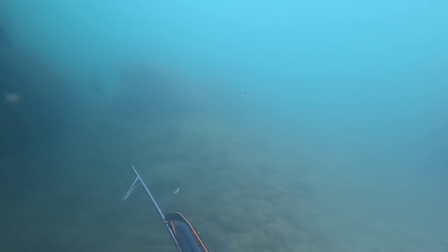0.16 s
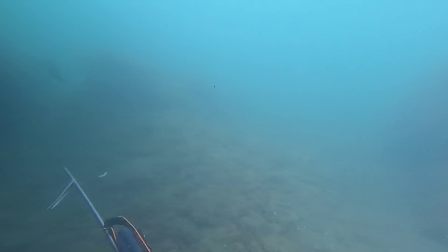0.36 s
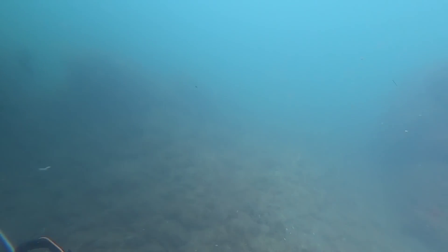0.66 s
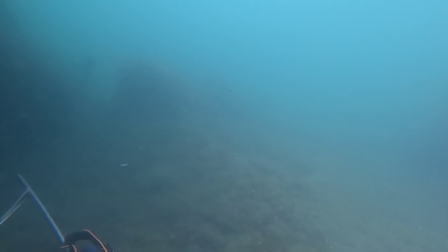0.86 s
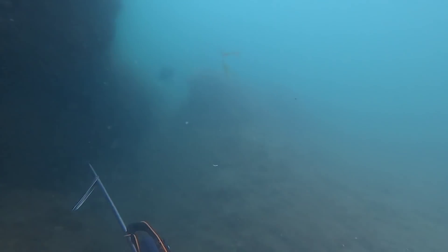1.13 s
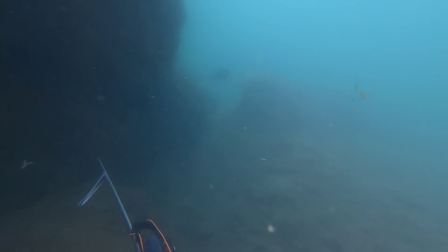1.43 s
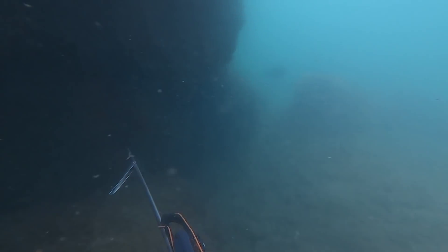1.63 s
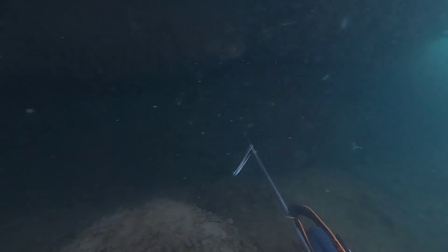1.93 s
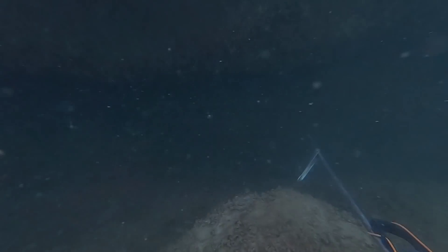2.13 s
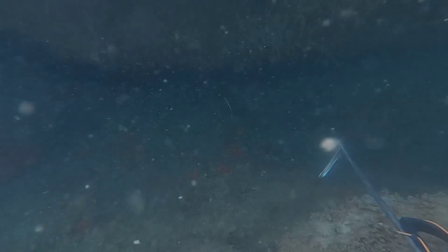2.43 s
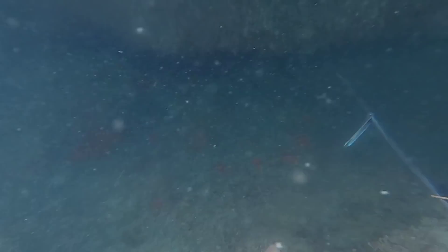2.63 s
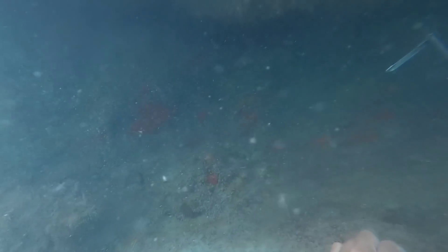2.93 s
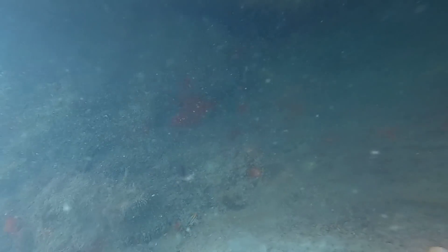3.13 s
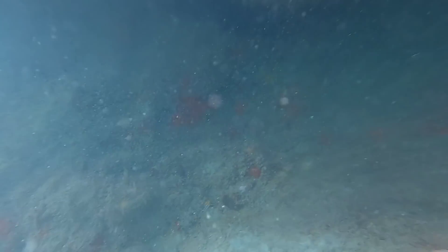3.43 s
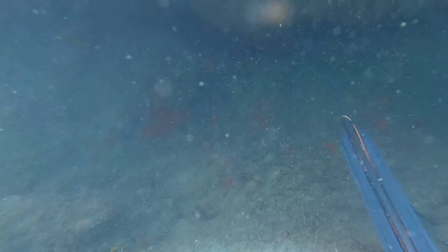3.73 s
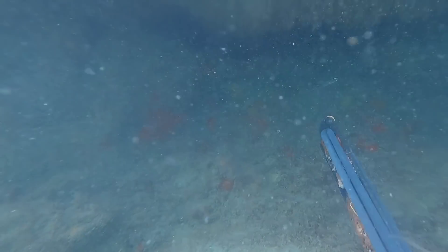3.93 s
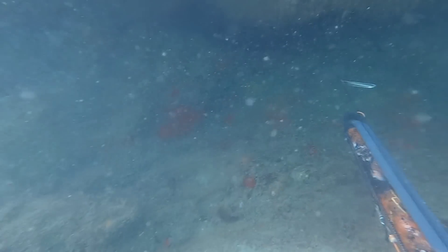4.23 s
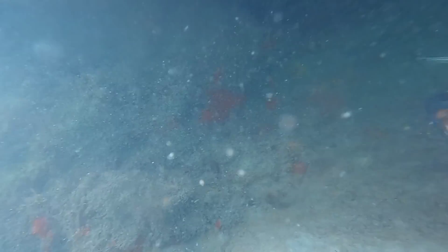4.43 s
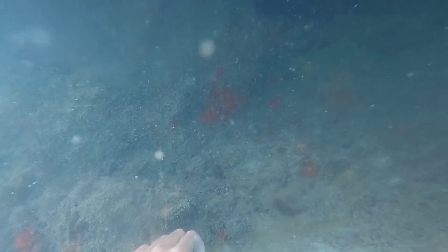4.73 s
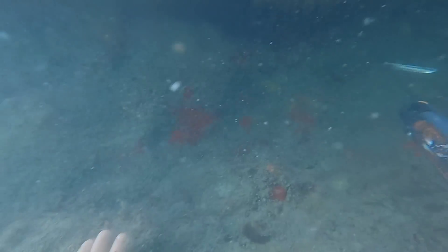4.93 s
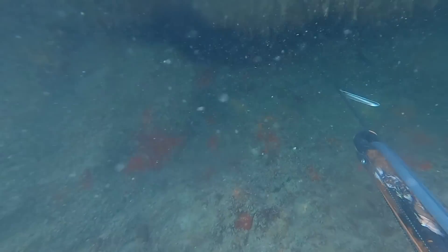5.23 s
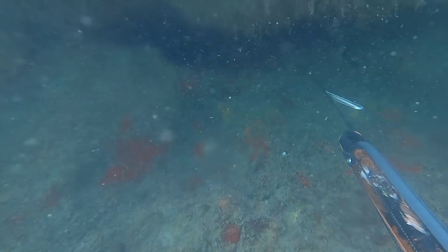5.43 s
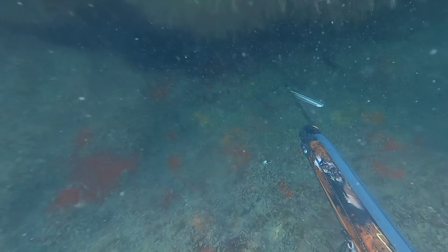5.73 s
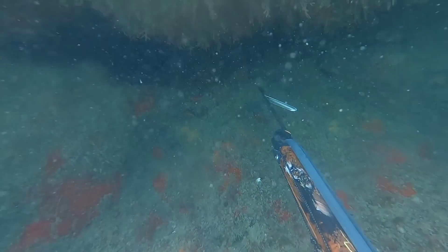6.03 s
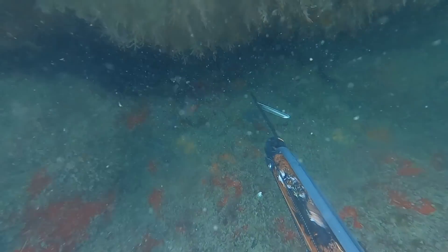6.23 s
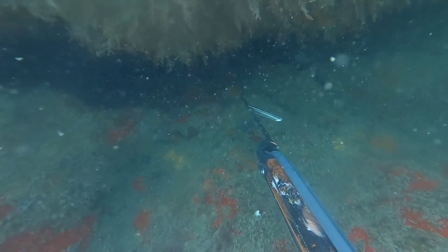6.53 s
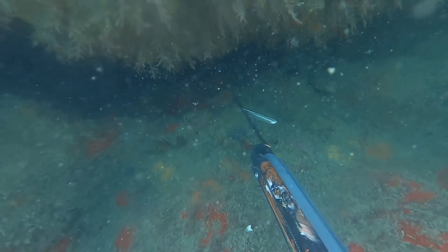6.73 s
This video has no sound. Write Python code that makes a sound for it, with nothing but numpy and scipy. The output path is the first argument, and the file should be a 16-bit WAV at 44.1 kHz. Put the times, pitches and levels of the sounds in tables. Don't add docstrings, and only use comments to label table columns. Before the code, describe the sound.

A diver with a speargun passes rock and seabed. The sealed underwater microphone hears a colony of snapping shrimp as constant frying hiss, with irregular dry clicks standing out, first crowded, later sparser and fainter. Gear and hands bump the case in low, boxy thuds, strongest near 4.8 and 5.8 seconds, between soft scrapes, muffled water buffeting and barely audible blips of bubbles.

```python
import sys
import numpy as np
from scipy import signal
from scipy.fft import rfft, irfft
from scipy.io import wavfile
from scipy.ndimage import uniform_filter1d, minimum_filter1d, map_coordinates

SR = 44100
rng = np.random.default_rng(int(sys.argv[2]) if len(sys.argv) > 2 else 0)


def boost(x):
    u = np.asarray(x, float) / 20
    return 10 ** u


def transcribe(signal):
    frames = np.atleast_2d(signal).T
    limited = np.clip(frames, -1, 1)
    pcm = np.round(limited * 32767).astype(np.int16)
    wavfile.write(sys.argv[1], SR, pcm)


N = 302967
SIZE = 4096
HZ = np.fft.rfftfreq(SIZE, 1 / SR)


def evened(x):
    return x / np.sqrt(np.mean(x ** 2) + 1e-20)


def read(points, hz):
    f, value = np.transpose(points)
    return np.interp(np.log(hz + 1), np.log(f + 1), value)


def curve(rows, column):
    rows = np.array(rows)
    return np.interp(np.arange(N) / SR, rows[:, 0], rows[:, column])


def add(mix, start_s, sound):
    part = mix[..., max(round(start_s * SR), 0):][..., :sound.shape[-1]]
    part += sound[..., :part.shape[-1]]


def causal(db):
    log_gain = np.maximum(db, -100) * np.log(10) / 20
    circle = np.concatenate([log_gain, log_gain[-2:0:-1]])
    return np.exp(log_gain - 1j * signal.hilbert(circle).imag[:len(HZ)])


def wander(hz):
    f = np.fft.rfftfreq(N, 1 / SR)
    return evened(irfft(rfft(rng.standard_normal(N)) * np.exp(-(f / hz) ** 2), N))


def bands(*edges_hz):
    slopes = [1 / (1 + (HZ / edge) ** 8) for edge in edges_hz]
    return np.diff([0 * HZ] + slopes + [1 + 0 * HZ], axis=0)


# start in seconds, peak in dB, then body, edge and sparkle
# over the crack in dB.
SNAPS = [(0.1708, -6, -5.5, 3.5, -15), (0.4106, -19, 3, -1, -28), (0.5607, -19.5, 14, 0, -14),
         (0.6657, -24, 6, 13, -12.6), (0.6919, -12.5, -2.5, -7.5, -8), (0.8505, -11, 5, 11, -12),
         (0.9091, -13.5, 3, -4, -22), (0.9757, -10.5, 5.5, -23, -21), (1.0868, -13.5, 2.5, 9.5, -3),
         (1.2355, -10.5, 3, 9.5, -8), (1.3474, -20.8, 2, 3.5, -5.5), (1.5463, -24.5, 2, -10, -27.0),
         (1.6993, -18.5, 2.5, -5, -13), (1.7155, -20.5, 4, -4.6, -27), (1.7429, -10.5, -2, -7, -14.5),
         (1.9248, -11.5, -6.5, 0.5, -7), (1.9706, -14, -6, -14, -15), (2.1679, -25, 3, -9, -15.1),
         (2.3169, -12, 4.5, -3.5, -28), (2.3325, -25, 0, -3, -14), (2.4032, -12, 3, -18, -16.5),
         (2.4405, -25, 22, 4, 1), (2.6925, -13.5, -5, -20, -21), (2.7944, -18, 5.5, 4, -10),
         (2.9147, -22.5, 4, 10, -7), (3.2665, -16, 5.5, 9.5, 9.5), (3.7286, -24.5, 1, -12, -6),
         (4.2098, -14.5, -2, -11, -18), (4.2543, -18, -7.5, -5, -15), (4.3076, -10.5, 0, -0.5, -21),
         (4.5397, -23.5, 13, 6, -25), (4.5959, -11.5, 2, -4.5, -8.5), (4.6343, -26, -7, -15, -7),
         (4.6702, -21.5, 8, 2, -17), (4.7242, -14.5, 0.5, -1, -8), (4.9287, -16, -2.2, -9, -5),
         (5.3778, -12.5, -6, 11, 2), (5.836, -23, 2, 2.5, -16), (6.172, -8.5, 20.5, 1, -15),
         (6.5112, -24.5, 1, 3, -16),
         (0.088, -30, 11, 9, -21), (0.2179, -29, -20, 0.8, -5), (0.4489, -26.5, 7.5, -3, -12.8),
             (0.4615, -25, 4, -8, -20.7), (0.54, -26, 7, 5, 4), (0.6226, -28, -1.1, 7, -5),
             (0.727, -29, 3, 2, -4), (0.7469, -26.5, 5, -3, -10.6), (0.8762, -27, -11, -10.6, -22),
             (0.8846, -27, -5, -1, 0), (0.919, -25, -10, -4, -5), (1.049, -25, 9, 1, -15.2),
             (1.145, -27, 2, -1, -9), (1.281, -26.5, -3, 9, 0), (1.4768, -27.5, 10, 12, 5),
             (1.509, -28, 1, -3, -11), (1.528, -24, 1, 0, -9), (1.6595, -29.5, 6, 14, -2),
             (1.8714, -25, -9, -2, -8), (1.9114, -28, -17.4, 3, -1), (2.179, -30.5, 10, 0, 14),
             (2.429, -31, -2, 8, -15.9), (2.649, -30, 4, -14, -18), (2.805, -29, -15, 3, -24.8),
             (2.823, -29, -4, 7, -5), (3.024, -24.5, 4, 1.5, -6), (3.3484, -29, -9, -2, -4),
             (3.6515, -26.5, 1.5, -6, -29.9), (4.0753, -25, -11, 16, -7), (4.332, -34, -1.8, -4, -14.5),
             (4.6832, -26.5, 8, 8, -3), (5.1989, -27, -4, -1.4, -5), (5.227, -28, -3, -10, -9),
             (5.461, -26.5, -2, -6, -28), (5.644, -32, -4, -1, -6), (5.6902, -26.5, 2, -24, -14),
             (6.196, -26.5, -7, 6, -5.3), (6.2953, -25.5, 26, 10, -6), (6.5042, -23.5, 9, -1, -21.1),
             (6.6022, -25, 4, 6, -3)]
# start in seconds, peak in dB, tilt from body to sparkle in dB.
TICKS = [(0.2558, -33.5, -3), (0.399, -37, 18), (1.4548, -35, -13), (1.6492, -31, -18), (1.8437, -43, 4),
         (2.2653, -42, -5), (2.273, -38, -2), (2.5833, -39, 14), (2.626, -34, -10), (2.7764, -36, 29),
         (3.163, -28.5, -22), (3.2424, -36, 15.4), (3.2515, -33, -17), (3.3037, -28.5, -11),
         (3.3975, -35.5, -13), (3.464, -35.5, 3), (3.5113, -32, -7), (3.6104, -35.5, 12), (3.698, -38, 33),
         (3.7874, -35, 11), (3.898, -35, -5), (3.917, -29, -5), (4.0884, -28, -30), (4.1205, -36, 26),
         (4.475, -34, 2), (4.5785, -26, -7), (4.835, -30, -6), (4.97, -30, -33), (4.9814, -33.5, 15),
         (4.999, -32.5, -34), (5.0251, -39, -16), (5.242, -30.5, -26), (5.4124, -30.4, -1),
         (5.4834, -28, -25), (5.5448, -30.5, -14), (5.6013, -28.5, -19), (5.635, -29, -21),
         (5.7151, -36, 17.2), (5.7476, -36, 3), (5.786, -27.5, -12), (5.8665, -32.5, -15), (5.9014, -40, 6),
         (6.038, -31.5, -17), (6.0547, -31, -8), (6.0841, -30, -15), (6.1491, -29.5, -15),
         (6.1626, -28.5, -14), (6.2853, -33, 4), (6.4033, -41, 14), (6.4347, -34.5, -30),
         (6.5352, -30, -14), (6.665, -27, -4), (6.6837, -36, 4), (6.773, -37, -1), (6.8267, -33, -12),
         (2.064, -30, -18), (2.081, -31, -12), (0.012, -30, -30), (0.043, -28.5, -32)]


def snap_colours():
    s, peak_db, tilt_db = np.transpose(TICKS)
    body_db = 4.5 + 0.06 * tilt_db
    sparkle_db = body_db + tilt_db
    ticks = np.transpose([s, peak_db, body_db, 0.65 * sparkle_db + 8.5, sparkle_db])
    return np.concatenate([SNAPS, ticks])


# snap time in seconds, lifted band in Hz, cancelled band in Hz, depth in dB.
FACES = [(0.171, 4600, 5960, 15.5), (0.692, 6540, 2400, 5), (0.851, 4160, 6400, 10),
         (0.909, 1320, 2380, 7.5), (0.976, 3870, 2880, 6), (1.087, 4600, 5360, 9), (1.699, 5370, 6180, 10),
         (1.743, 4860, 5600, 11), (1.925, 4700, 5160, 11), (1.971, 1450, 2540, 22), (2.317, 5040, 1290, 9),
         (2.693, 5100, 3080, 7), (2.794, 6000, 2520, 3), (3.266, 2500, 4350, 15), (4.21, 5700, 4910, 7),
         (4.308, 2370, 6400, 3), (4.596, 6400, 4750, 6), (4.724, 5950, 6350, 10), (4.929, 5260, 4740, 8),
         (6.172, 3500, 2820, 9)]


def face_echoes(s):
    width_hz = 550
    db = np.zeros((len(s), len(HZ)))
    for at_s, lifted_hz, cancelled_hz, depth_db in FACES:
        centres_hz = np.array([[lifted_hz], [cancelled_hz]])
        lift, dip = 1 / (1 + (2 * (HZ - centres_hz) / width_hz) ** 2)
        db[abs(s - at_s).argmin()] = depth_db * (lift - dip)
    return boost(db)[:, None]


# frequency in Hz, gain in dB.
WALL = [(300, -8.5), (600, -1), (850, -14), (1300, -1.5), (2500, 2), (6000, -1), (8000, -11.5),
        (10000, -18.5), (13000, -23), (15500, -33), (16300, -41)]
# frequency in Hz, width in Hz, left gain in dB, right gain in dB.
CASE = [(991, 107, 16, 11.5), (915, 77, -5.5, -22), (1110, 27, -7, -4.5), (1452, 49, 6.5, 2),
        (1233, 280, -7, 1), (1747, 350, 13, 5), (2220, 99, -6, 9.5), (2738, 190, 6, -37), (3233, 295, 9, 5),
        (3794, 520, 10, 11.5), (3935, 255, 2.5, -20.5), (4740, 110, 0, 2), (5152, 676, 5.5, 15.5),
        (6820, 1080, -3, 6), (7620, 1040, 6, -6), (8500, 890, 1, -4.5), (12600, 4200, -2, 4)]
# frequency in Hz, left-right likeness from 0 to 1.
LIKENESS = [(700, 1), (1100, .85), (1800, .98), (2700, .7), (3800, .87), (4500, .4), (5200, .88),
            (6200, .3), (7100, .75), (8000, .4), (8800, .7), (10000, .45), (11500, .62), (13000, .3)]
# frequency in Hz, lead of the right port in radians.
LEAD = [(60, 10.5), (330, 0.5), (550, 0), (800, 2), (1700, .5), (2000, 1.5), (2700, 2.5), (3100, 0.55),
        (3700, 6.5), (4300, 1), (5800, 5.5), (6500, 5.5), (7300, -1.5), (7700, 7), (8500, 6.5)]


def ports():
    bumps = []
    for hz, width_hz, left_db, right_db in CASE:
        bumps.append(np.outer([left_db, right_db], 1 / (1 + (2 * (HZ - hz) / width_hz) ** 2)))
    left_db, right_db = read(WALL, HZ) + sum(bumps)
    late = np.exp(-2j * np.pi * HZ * 64 / SR)
    left = causal(left_db) * late
    right = left * boost(right_db - left_db) * np.exp(1j * read(LEAD, HZ))
    same = np.clip(read(LIKENESS, HZ), 0, 1)
    return left, same * right, np.sqrt(1 - same ** 2) * right


SPLIT_HZ = (2500, 4400, 7000)


def snaps():
    s, peak_db, body_db, edge_db, sparkle_db = snap_colours().T[..., None]
    ms = np.arange(SIZE // 2) / SR * 1000 - 8
    after = np.maximum(ms, 0)
    far_db = 1.2 * rng.standard_normal((len(s), 1)) - 0.3 * (peak_db + 12) + 0.15 * np.maximum(body_db, 0)
    spread = np.minimum(1.2 * boost(far_db), 2.6)
    draws = rng.standard_normal((len(s), 2, len(ms)))
    small_bubble = boost(-9.0 / (1 + (HZ / 1150) ** 6))
    left, right, own = np.array(ports()) * small_bubble
    echoed = face_echoes(s) / np.sqrt(1 + (HZ / 14500) ** 10)
    levels_db = (body_db - 0.6, 0 * s, edge_db + 0.2, sparkle_db - 0.6)
    earlies = (0.005, 0.01, 0.012, 0.12)
    decays_ms, tails = (1.81, 1.6, 1.05, 0.56), (0.029, 0.06, 0.044, 0.04)
    front = np.exp(np.minimum((np.arange(SIZE) / SR * 1000 - 9.2) / 0.2, 0))
    sound = 0
    for band, db, early, decay_ms, tail in zip(bands(*SPLIT_HZ), levels_db, earlies, decays_ms, tails):
        attack = np.minimum(after / (0.4 * spread), 1)
        decay = np.exp(-(after / (decay_ms * spread)) ** 0.94) + tail * np.exp(-after / 7.0)
        shape = attack * decay + early * np.exp(-abs(ms) / 1.0)
        z = rfft(draws * shape[:, None], SIZE)
        z = z / uniform_filter1d(abs(z), size=40) ** 0.66
        a, b = np.moveaxis(z, 1, 0)
        part = irfft(np.stack([a * left, a * right + b * own], 1) * band * echoed, SIZE)
        part = part * np.minimum(front + 8 * early, 1)
        sound = sound + part * (boost(db) / abs(part.mean(1)).max(1, keepdims=True))[:, None]
    sound *= (boost(peak_db - 2.0) / abs(sound.mean(1)).max(1, keepdims=True))[:, None]
    out = np.zeros((2, N))
    for start_s, one in zip(s[:, 0], sound):
        add(out, start_s - 0.0095, one[:, :3000])
    return out


# frequency in Hz, width in Hz, level in dB.
SHELL = [(335, 36, -5), (390, 30, 0), (450, 32, 0), (508, 30, -4), (570, 36, -6)]


def shell_response(modes, leak_db=-93.0, dull_hz=900):
    power = sum(boost(db) ** 2 / (1 + (2 * (HZ - hz) / width_hz) ** 2) for hz, width_hz, db in modes)
    power = power / (1 + (HZ / 670) ** 14) / (1 + (HZ / dull_hz) ** 6)
    blocked = 1 - 0.53 / (1 + ((HZ - 850) / 90) ** 2)
    leak = boost(leak_db) ** 2 / (1 + (HZ / 1350) ** 20) * blocked
    return irfft(causal(10 * np.log10(power + leak)), SIZE)


def struck_shell(bumps):
    out, ms = np.zeros(N), np.arange(SIZE) / SR * 1000
    rubs = rng.standard_normal((len(bumps), SIZE))
    for (s, peak_db, hz, length_ms, hard_db), rub in zip(bumps, rubs):
        fade = np.exp(-(ms / max(1.49 * length_ms, 0.5)) ** 2) + 0.06 * np.exp(-ms / 18)
        rub = rub * np.minimum(ms / 4.7, 1) * fade
        jolt = 0.79 * np.linalg.norm(rub) * np.exp(-2j * np.pi * HZ * 0.00196)
        push = rfft(rub) - jolt
        scrape = irfft(push / uniform_filter1d(abs(push), size=7))[:SIZE // 2]
        spot = [(hz, 110, 9.0), (170, 140, -0.6 - 1.0 * max(hard_db + 26.5, 0))]
        response = shell_response(SHELL + spot, hard_db + 0.5, 1.09 * hz)
        ring = signal.fftconvolve(scrape, response)[:SIZE]
        ring = ring / (1 + (ms / (length_ms + 13)) ** 5)
        add(out, s, boost(peak_db + 2.5) * ring / abs(ring).max())
    return out


# start in seconds, peak in dB, ring in Hz, scrape length in ms, hardness in dB.
KNOCKS = [(1.962, -13, 375, 3.7, -34), (1.974, -13.5, 310, 8.2, -23.5), (2.399, -36.5, 293, 5.9, -12),
          (2.434, -13.5, 480, 7.4, -12.5), (2.512, -30.5, 457, 3.8, -27), (3.339, -18, 382, 13.5, -49),
          (3.539, -15.5, 238, 13, -30.5), (4.762, -11.5, 535, 5.8, -58), (4.77, -10.5, 330, 12, -61),
          (4.804, -27, 405, 8.6, -42), (4.830, -13.5, 325, 5.2, -49), (4.875, -24, 378, 6.5, -43),
          (5.790, -7.5, 319, 12.5, -48), (5.797, -17.5, 189, 5.8, -65), (5.804, -12.5, 432, 5, -47),
          (6.170, -29, 497, 8.4, -2), (2.335, -35.5, 480, 8.3, 11)]
# start in seconds, peak in dB, ring in Hz, scrape length in ms.
BRUSHES = [(0.663, -39, 567, 4.9), (2.264, -42, 397, 3.3), (2.308, -38.5, 525, 12), (3.097, -36.5, 457, 29),
           (3.4, -32.5, 405, 24), (3.443, -37.5, 478, 2.5), (3.473, -36, 436, 1.9),
           (3.504, -32.5, 443, 3.6), (3.524, -30.5, 486, 2.6), (4.585, -33, 490, 35), (5.209, -36, 256, 41),
           (5.335, -31.5, 420, 48), (6.042, -39, 450, 8.9), (6.368, -35.5, 433, 14),
           (0.404, -42.5, 197, 11), (6.38, -34.5, 165, 28)]


def knocks():
    brush_hardness_db = -21
    return struck_shell(KNOCKS + [row + (brush_hardness_db,) for row in BRUSHES])


# start in seconds, peak in
# dB, ring in Hz.
NUDGES = [(0.012, -36.5, 430), (0.091, -49, 445), (0.39, -45, 448), (1.101, -42.5, 455), (1.208, -53, 480),
          (1.453, -40.5, 468), (1.483, -42.5, 416), (1.659, -42, 304), (2.22, -53, 450), (2.551, -37, 500),
          (2.64, -38, 490), (2.779, -41, 460), (2.942, -43, 386), (3.015, -40.5, 350), (3.075, -46, 452),
          (3.143, -38, 487), (3.164, -39, 430), (3.237, -40.5, 441), (3.759, -41, 463), (3.978, -41, 386),
          (4.407, -55, 326), (4.451, -44, 445), (4.786, -39, 404), (4.976, -39, 458), (5.023, -42, 576),
          (5.262, -54, 269)]


def nudges():
    length_ms, hardness_db = 7.6, -19.5
    return struck_shell([row + (length_ms, hardness_db) for row in NUDGES])


# start in seconds, peak in dB, swing in Hz.
SHOVES = [(0.4, -34.5, 101), (0.848, -26.5, 36.2), (1.922, -23, 39.4), (1.961, -10.5, 84),
          (2.249, -38, 33.7), (2.409, -22, 77.4), (2.514, -15.5, 86.5), (2.552, -12.5, 98),
          (2.724, -23, 45.3), (2.766, -25.5, 35), (3.35, -24.5, 44.7), (4.256, -24, 35), (4.576, -36, 46),
          (4.772, -14, 151), (4.841, -29, 32.8), (4.871, -14.5, 46), (5.249, -23.5, 59.6),
          (5.7951, -6.5, 154), (5.81, -20.5, 72), (2.264, -29.5, 102), (6.369, -46, 32.7), (6.667, -26, 34)]


def shoves():
    out, t = np.zeros(N), np.arange(SIZE * 2) / SR
    for s, peak_db, hz in SHOVES:
        turns = hz * t
        swing = -np.sin(2 * np.pi * turns) * turns * np.exp(-turns / 0.65)
        add(out, s, boost(peak_db - 2.0) * swing / abs(swing).max())
    return out


# start in seconds, peak in dB, pitch in Hz, length in ms.
SOFT_TONES = [
    (4.011, -34.5, 556, 27),
    (6.047, -38, 440, 20),
    (6.167, -32, 440, 15),
]


def soft_tones():
    rise = 0.03
    out = np.zeros(N)
    for s, peak_db, hz, length_ms in SOFT_TONES:
        u = np.arange(0, 1, 1000 / (length_ms * SR))
        note = np.sin(2 * np.pi * np.cumsum(hz * (1 + rise * u)) / SR)
        add(out, s, boost(peak_db) * np.sin(np.pi * u) ** 0.52 * note)
    return out


# time in seconds, level in dB.
COLONY = [(0.0, 6), (0.13, -1), (0.5, 1.5), (1.34, 0), (2.09, 1.5), (2.41, -4.5), (2.56, 1.5), (3.52, -0.8),
          (4.48, 3), (4.65, 1), (5.66, -1.5), (6.05, -6), (6.3, -2), (6.87, -1)]


def colony():
    level_db, snaps_per_s = -45.5, 320
    size = boost(5.0 * np.minimum(rng.exponential(1, N), 2.3)) * (rng.random(N) < snaps_per_s / SR)
    ms = np.arange(1500) / SR * 1000
    echoes = np.exp(-ms / 1.8) + 0.04 * np.exp(-ms / 8)
    out, case = np.zeros((2, N)), np.array(ports())
    scatters_db = (11.6, 11.6, 11.6, 11.6, 9, 7)
    beds = (0.3, 0.28, 0.28, 0.28, 0.55, 0.85)
    for band, scatter_db, bed in zip(bands(2400, 3400, 4500, 7000, 10500), scatters_db, beds):
        tinted = size * boost(scatter_db * np.clip(rng.standard_normal(N), -2, 1.6))
        crackle = evened(np.sqrt(abs(signal.oaconvolve(tinted ** 2, echoes)[:N])))
        a, b = rng.standard_normal((2, N)) * np.sqrt(crackle ** 2 + bed * boost(2.5 * wander(12.0)))
        left, right, own = np.roll(irfft(case * band, SIZE), 128, axis=1)[:, :1800]
        right_side = signal.oaconvolve(a, right) + signal.oaconvolve(b, own)
        out += np.array([signal.oaconvolve(a, left), right_side])[:, 192:N + 192]
    turning = np.cumsum(0.022 * wander(7.0))
    at = np.arange(N) + turning - np.linspace(turning[0], turning[-1], N)
    out = np.array([map_coordinates(side, [at], order=3, mode="mirror") for side in out])
    return boost(level_db + curve(COLONY, 1)) * evened(out)


# frequency in Hz, level in dB per Hz.
RUMBLE = [(8.8, -20), (15, 1.5), (27, 1), (43, -0.5), (70, -13), (93, -8.5), (130, -29), (170, -60),
          (290, -120)]
# time in seconds, speed through the water in dB, fidget of the hands in dB.
FLOW = [(0.0, 5, 0.5), (0.53, -6, -0.5), (0.94, -2, 5.5), (1.26, 0, -5), (1.8, -5.5, 2.5), (2.03, 7, -1),
        (2.79, 0, 8), (3.06, 0.5, -1), (3.46, -1.5, 14), (3.74, 6.5, 9), (4.06, 1, -1), (4.3, 2.5, 6),
        (5.05, 9, 9), (5.43, 6, 15.5), (5.89, 0, -1), (6.12, 0, -7), (6.35, 4.5, 14.5), (6.87, 2.5, -11)]


def flow():
    rumble_db, mount_db, hum_db, hum_share = -39.5, -59.5, -56.5, 0.38
    f = np.fft.rfftfreq(N, 1 / SR)
    eddies = irfft(rfft(rng.standard_normal(N)) * boost(read(RUMBLE, f)), N)
    rumble = evened(eddies * boost(2.5 * wander(9)))
    lumps = rng.standard_normal((2, N)) * boost(2.6 * wander(32))
    mount_response = shell_response([(137.0, 50, 8.2), (217, 47, 0.46)])
    mount = evened(signal.oaconvolve(lumps[0], mount_response)[:N])
    hum = evened(signal.oaconvolve(lumps[1], shell_response(SHELL))[:N])
    speed_db, fidget_db = curve(FLOW, 1), curve(FLOW, 2)
    out = rumble * boost(rumble_db + speed_db) + mount * boost(mount_db + fidget_db)
    return out + hum * boost(hum_db + hum_share * fidget_db)


def scene():
    body = knocks() + soft_tones() + shoves() + flow() + nudges()
    f = np.fft.rfftfreq(N, 1 / SR)
    left_db = np.interp(f, [250, 450], [1.2, 1.9])
    lead_rad = np.interp(f, [0, 330, 560, 800], [0, 0.15, 0.95, 0.1])
    left = irfft(rfft(body) * boost(left_db), N)
    right = irfft(rfft(body) * boost(-left_db) * np.exp(1j * lead_rad), N)
    return np.array([left, right]) + snaps() + colony()


def starve(x, edge_hz=6500, over_db=7.3):
    hz, _, z = signal.stft(x, SR, nperseg=256, noverlap=128)
    rows, frames = len(hz), z.shape[-1]
    level_db = 10 * np.log10(uniform_filter1d((abs(z) ** 2).mean(0), size=7, axis=0) + 1e-16)
    loudest_db = np.roll(-minimum_filter1d(-level_db[hz > 2600].max(0), size=21), 2)
    hz = hz[:, None]
    slope_db = 0.13 * (hz - edge_hz) / 1000
    patches = rng.standard_normal((rows // 4 + 1, frames // 2 + 1))
    patchy_db = 5.0 * np.kron(patches, np.ones((4, 2)))[:rows, :frames]
    floor_db = uniform_filter1d(level_db, size=200, axis=1)
    excess_db = 0.65 * (loudest_db - uniform_filter1d(loudest_db, size=400))
    masked = excess_db + slope_db + patchy_db > over_db
    top_hz = np.where(np.repeat(patchy_db[-1, ::2], 8)[:frames] > 2.5, 14500, 15900)
    masked |= hz > top_hz
    dropped = masked & (hz > edge_hz) & (level_db < floor_db + 6.0)
    dropped |= (hz > 15850) & (loudest_db < np.median(loudest_db) + 17)
    dropped |= hz > 16400
    return signal.istft(z * np.where(dropped, 0.03, 1), SR, nperseg=256, noverlap=128)[1][:, :N]


def roll_off(x):
    return signal.sosfilt(signal.butter(12, 16470, fs=SR, output="sos"), x)


def record(dry):
    finished = starve(dry)
    return roll_off(finished)


dry = scene()
out = record(dry)
transcribe(out)
```